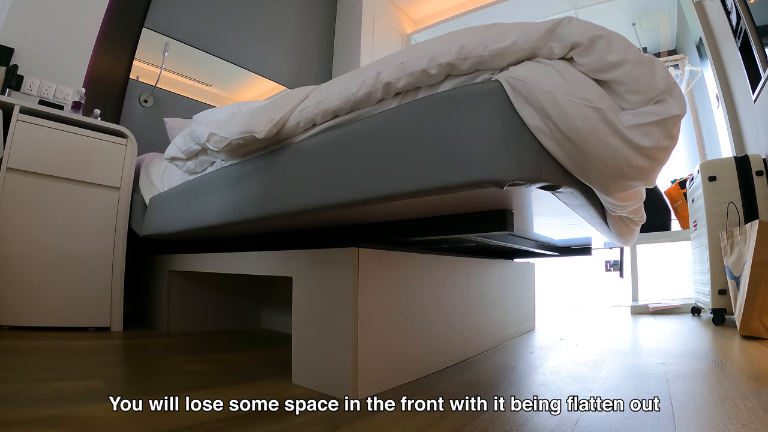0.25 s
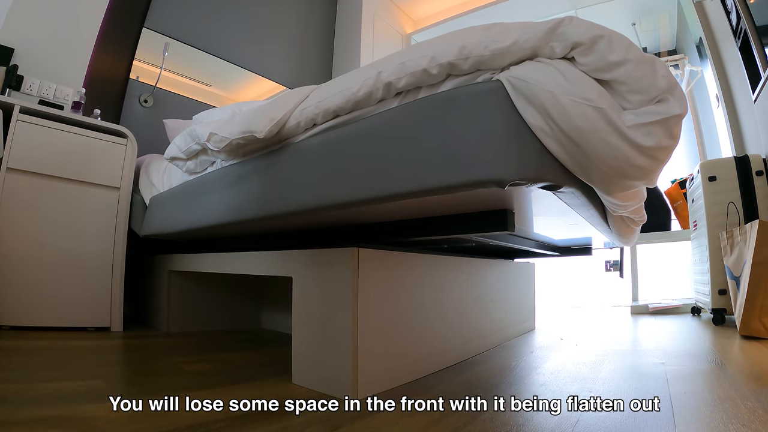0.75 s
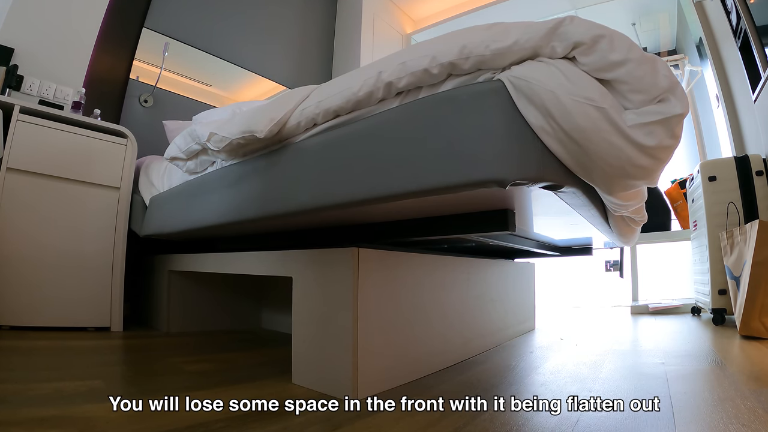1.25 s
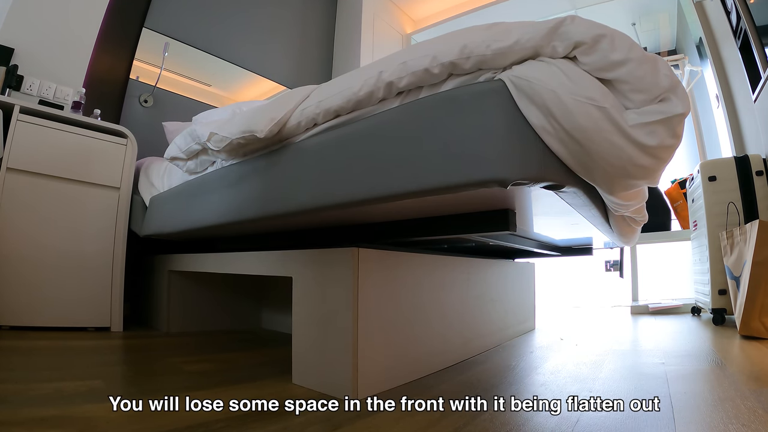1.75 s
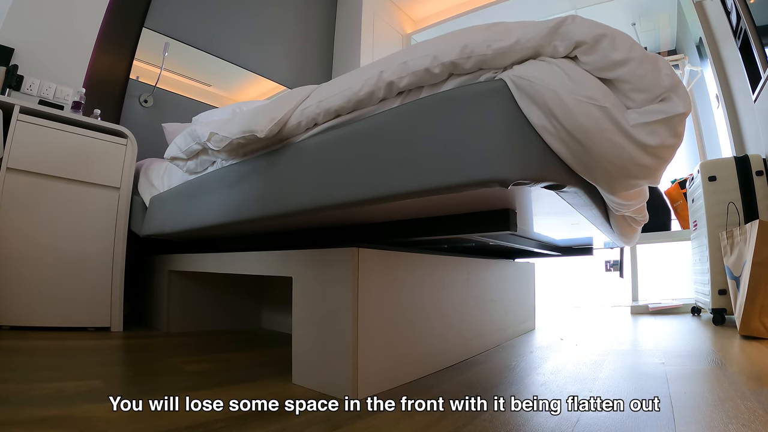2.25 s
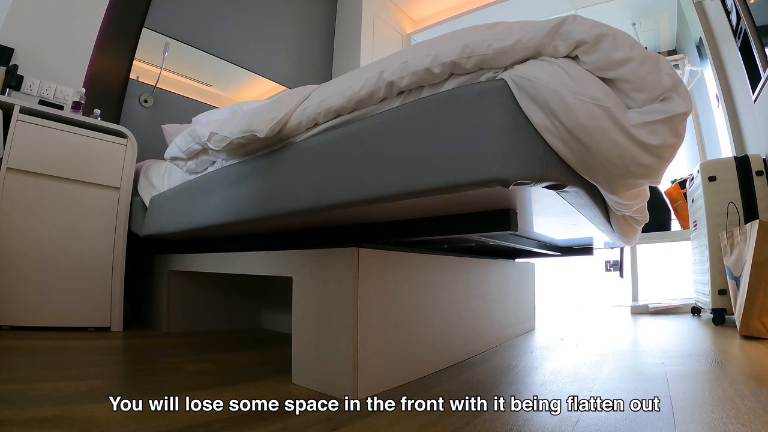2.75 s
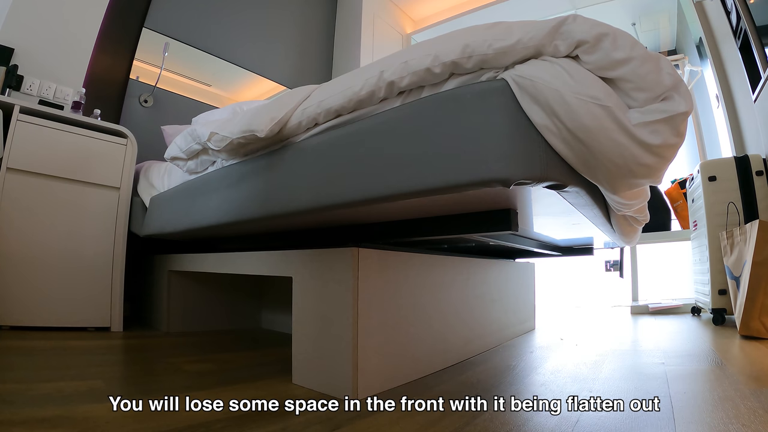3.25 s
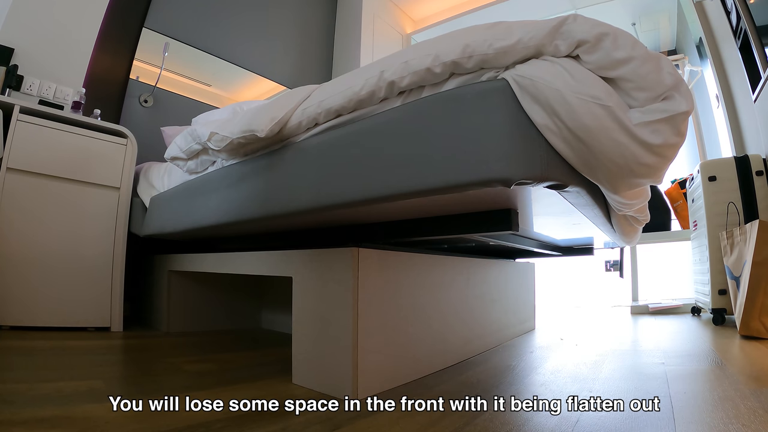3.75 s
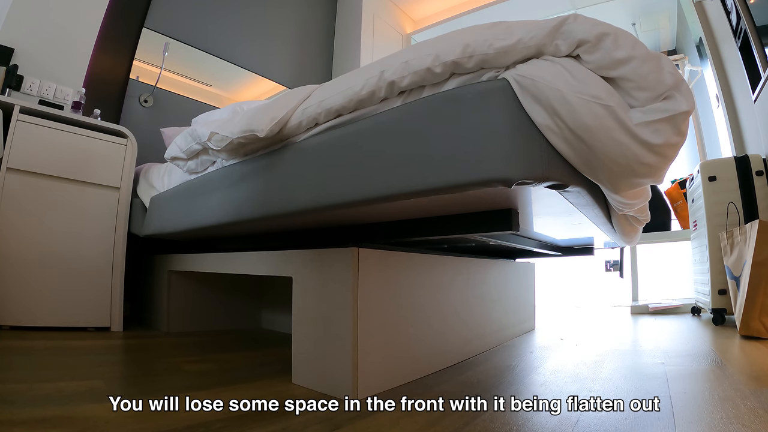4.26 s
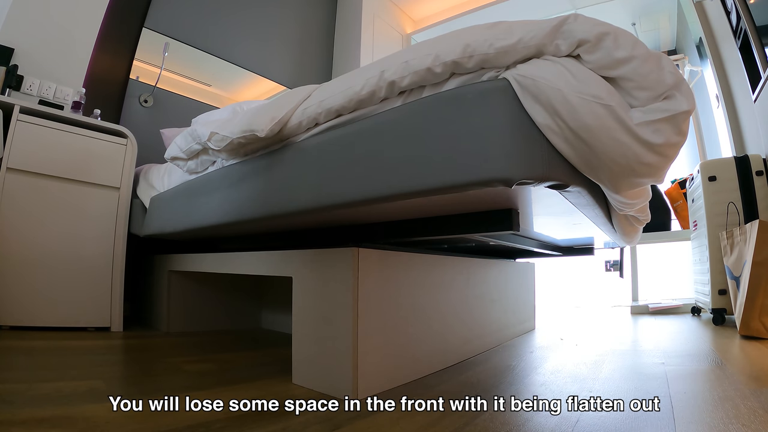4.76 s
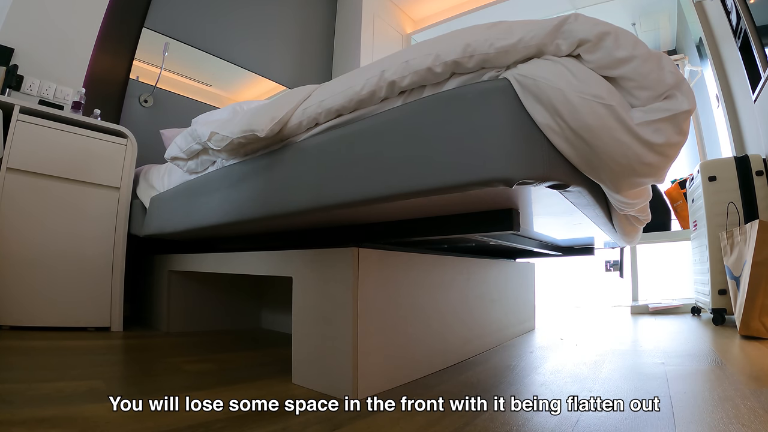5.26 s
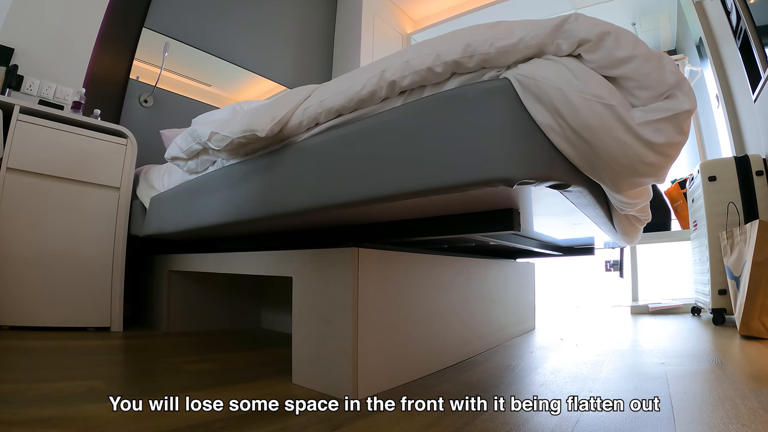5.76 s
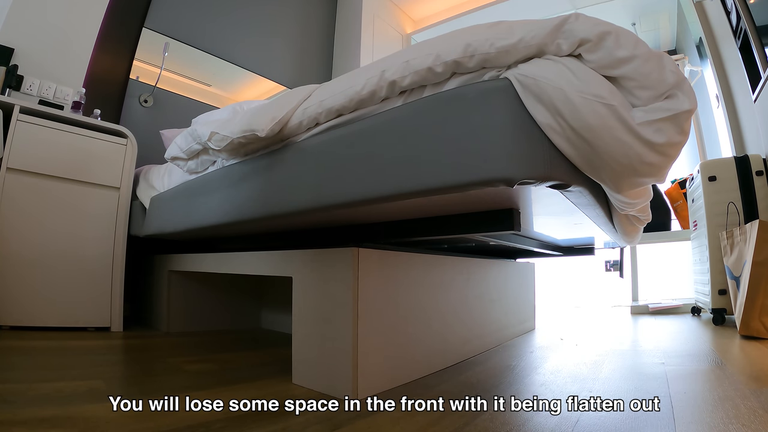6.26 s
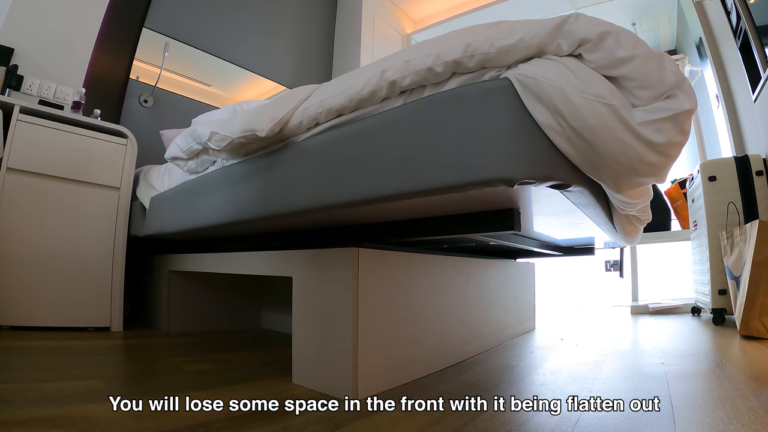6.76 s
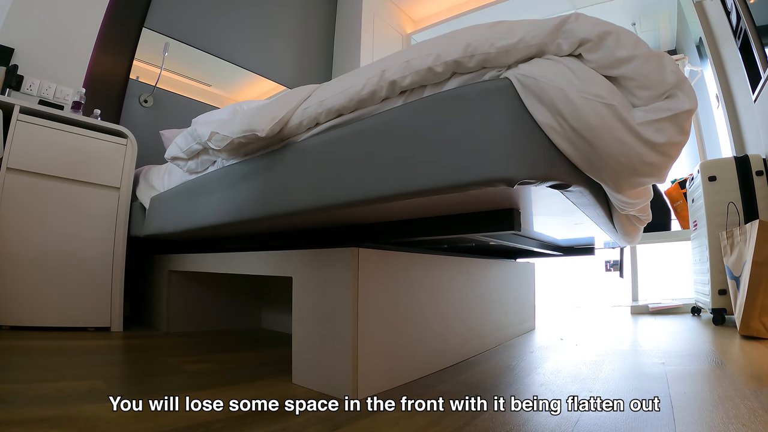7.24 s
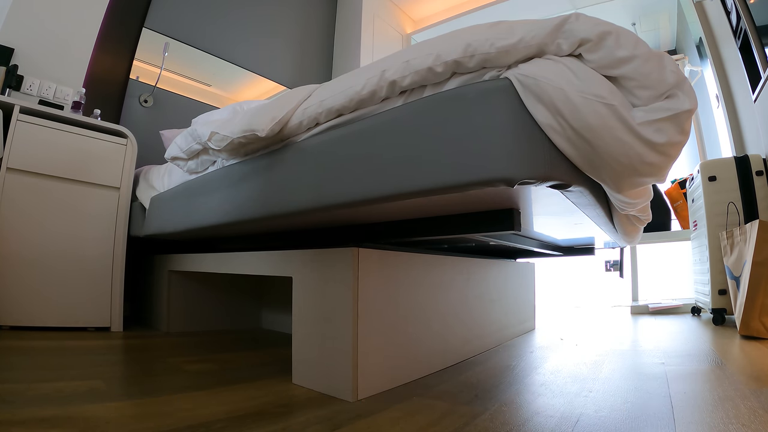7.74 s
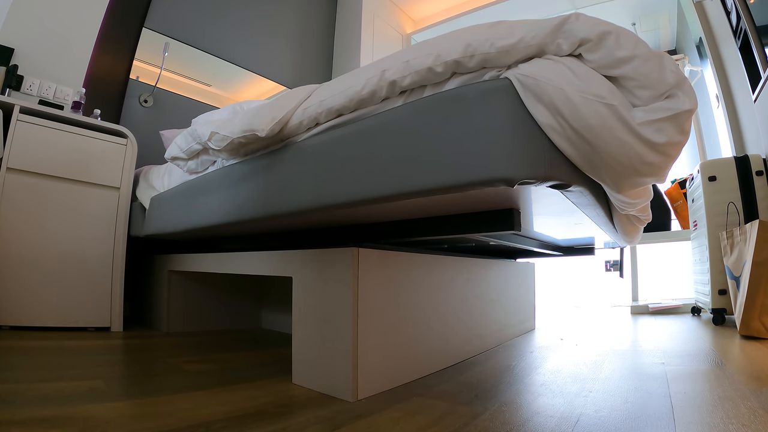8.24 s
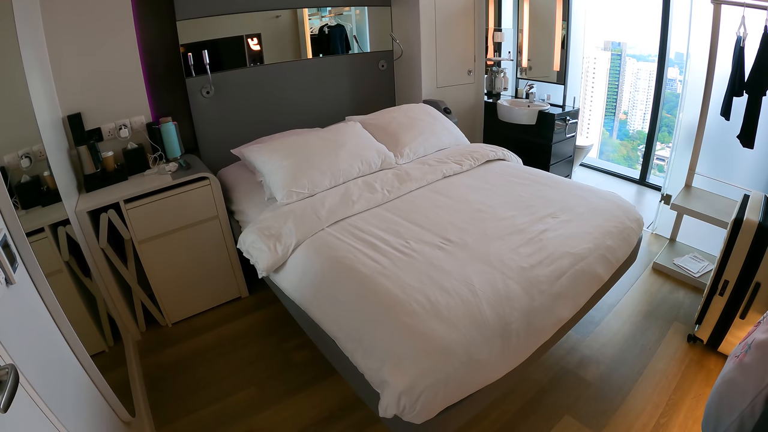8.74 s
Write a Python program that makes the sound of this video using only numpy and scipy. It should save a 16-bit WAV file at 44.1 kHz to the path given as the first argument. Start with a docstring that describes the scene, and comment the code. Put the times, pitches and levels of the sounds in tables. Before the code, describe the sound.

Adjustable bed motor hums steadily with a faint rattle and one creak, stops with a click and muffled clunks, followed by airy room ventilation.

```python
"""A small room, heard from the floor near an adjustable bed whose geared motor lowers the mattress.
The gear mesh sings one note over weaker shaft harmonics, filtered-noise frame rumble and brush hiss;
the lead screw rubs now and then, ringing the housing, and the frame creaks once.
A switch clicks, the motor stops, and the frame shudders and settles with dull knocks of damped sines and noise.
Then ventilation fades in, fan lines over rushing air, with soft bumps of low noise."""
import sys
import numpy as np
from scipy import signal
from scipy.fft import rfft, irfft
from scipy.io import wavfile

SR = 44100
rng = np.random.default_rng(int(sys.argv[2]) if len(sys.argv) > 2 else 0)


def generate_wav(signal):
    """Clip the signal to [-1, 1] and save it as 16-bit WAV at the path in sys.argv[1]."""
    frames = np.transpose(np.atleast_2d(signal))
    scaled = np.clip(frames, -1, 1) * 32767
    pcm = np.round(scaled).astype(np.int16)
    wavfile.write(sys.argv[1], SR, pcm)


N = 396900  # 9 s
T = np.arange(N) / SR
HZ = np.fft.rfftfreq(N, 1 / SR) + 0.00083  # the offset keeps log(HZ) finite

# Table levels are nominal: trims, wavering and the final filters come after them.
# Spectra are relative: colour() brings each to rms 1.

# hush of the room: (frequency [Hz], density [dB per Hz])
QUIET_SPECTRUM = [(200, -12), (340, 2), (430, -3.5), (600, -1), (680, -2.5), (750, -6.5), (950, -12),
                  (1100, -12), (2000, -16), (3000, -20.5), (4000, -26), (7000, -34), (9000, -54.5),
                  (12500, -48.5)]
QUIET_DB = -54.5

# ventilation air and its lighter hiss: (frequency [Hz], density [dB per Hz])
AIR_SPECTRUM = [(25, -23), (45, -13), (75, -0.5), (170, 2), (230, 1), (275, -3.5), (330, 1.5), (400, -8.5),
                (660, -17.5), (950, -26), (1600, -27.5), (4500, -45), (8500, -65), (12000, -77)]
DRAUGHT_SPECTRUM = [(1200, -7), (3000, -2), (4300, 2), (7000, -8), (9000, -30), (10800, -16), (12800, -32)]
# fan hum lines: (frequency [Hz], level [dB])
FAN_LINES = [(99.8, -44.5), (132.9, -48)]
# the fan hum swells and sags: (time [s], gain [dB])
FAN_SWELL_CURVE = [(7.92, 4), (8.02, -1), (8.19, 4), (8.28, -5), (8.4, 4), (8.6, 0), (8.78, -2.5),
                   (8.89, 0.5), (8.95, -6)]
# one puff of the draught: (time [s], half-width [s], gain [dB])
DRAUGHT_PUFF = (8.85, 0.18, 8.5)
VENT_START_S, VENT_FADE_S = 7.862, 0.8
VENT_TRIM_DB, DRAUGHT_DB = -0.6, -74.5

# soft bumps: (frequency [Hz], density [dB per Hz]), then (time [s], level [dB], t60 [s])
BUMP_SPECTRUM = [(60, -15), (150, -5), (330, 3), (500, 1), (700, 0.5), (820, -14), (1600, -14), (3000, -26),
                 (5000, -29), (9000, -53)]
BUMP_EVENTS = [(8.09, -48, 0.46), (8.155, -52, 0.25), (8.283, -42.5, 0.46)]

# noise of thuds and shudder, cracks and switch: (frequency [Hz], density [dB per Hz])
THUD_SPECTRUM = [(150, -32.5), (250, -15), (340, -5), (430, -2.5), (520, 1), (690, 0), (770, -12),
                 (950, -17.5), (1400, -40.5), (3000, -69.5)]
CRACK_SPECTRUM = [(400, -13.5), (850, 3.5), (1300, 8.5), (2000, 7), (2900, 2.5), (4000, -7.5), (6300, -10),
                  (8800, -33.5), (11000, -27.5), (12500, -32)]
SWITCH_SPECTRUM = [(1500, -24.5), (2900, -13), (3450, 6), (4200, -4), (5000, -12), (7500, -16), (9200, -28),
                   (12000, -27)]
# frame shaking on after the stop: (time [s], level [dB])
SHUDDER_CURVE = [(7.0, -93), (7.07, -49), (7.14, -41.5), (7.2, -43.5), (7.25, -50), (7.29, -48),
                 (7.38, -50), (7.5, -69), (7.56, -55), (7.7, -66), (7.8, -90)]
# frame resonances singing out: (time [s], half-width [s], frequency [Hz], level [dB])
SHUDDER_TONES = [(7.11, 0.02, 815, -49), (7.175, 0.029, 676, -46.5), (7.295, 0.035, 682, -44.5)]
# frame knocks and creak: (time [s], thud [dB], thud pitch [Hz], thud build-up [s], crack [dB],
# crack treble gain [dB], t60 of crack and room tail [s])
KNOCK_EVENTS = [(3.540, -36, 623, 0.006, -46.5, 6.5, 0.15), (3.555, -41.5, 480, 0.0055, -56.5, 8, 0.63),
                (7.095, -48, 680, 0.005, -68, -4, 0.86), (7.122, -41, 498, 0.005, -59, -3, 0.87),
                (7.282, -40, 564, 0.0056, -66, -5, 0.25), (7.305, -37, 606, 0.006, -70, -5, 0.25),
                (7.433, -43, 610, 0.0034, -72, -8, 0.11), (7.589, -44.5, 560, 0.006, -73, 1.5, 0.46),
                (7.604, -40, 567, 0.006, -73, -4, 0.44), (7.621, -39, 529, 0.0064, -67, -4, 0.44),
                (7.663, -44, 600, 0.005, -59, -15, 0.15), (7.678, -31.5, 601, 0.006, -49.5, -15, 0.12),
                (7.693, -34, 508, 0.0053, -60, -12, 0.33), (7.708, -40, 473, 0.0041, -63, -3, 0.17),
                (7.728, -42, 500, 0.003, -65, -4, 0.2)]
# switch click: (time [s], level [dB], t60 [s])
SWITCH_CLICK = (7.078, -56.5, 0.31)

# bed frame resonances: (frequency [Hz], width [Hz], relative gain [dB])
FRAME_MODES = [(337, 33, -8.5), (431, 82, -3.5), (506.4, 95, 0.5), (578.7, 91, 2), (637.5, 58.5, 2.5),
               (674.8, 28, 2), (844, 68, -9.5)]
# rattle of the teeth and hiss of the brushes: (frequency [Hz], density [dB per Hz])
RATTLE_SPECTRUM = [(600, -29), (900, 0), (1200, 1.5), (1450, 1), (1650, -3), (1900, -1.5), (2250, -5.5),
                   (2950, -6.5), (3600, -17), (5000, -44.5)]
BRUSH_SPECTRUM = [(1800, -19.5), (2700, 4), (3500, 3), (4500, 1.5), (5500, 0.5), (7000, -6), (8000, -12),
                  (9200, -23), (11000, -12), (12800, -26.5)]
# levels changing evenly over the travel: (bed upright [dB], bed flat [dB])
RUMBLE_TRAVEL = (-53.5, -46.5)
RATTLE_TRAVEL = (-58.5, -58.5)
HOUSING_TRAVEL = (-74, -62)
# lead screw rubs: (time [s], half-width [s], rise of housing ring and high whine [dB], rise of rattle [dB])
SCREW_RUBS = [(0.43, 0.07, 3, 0.5), (1.378, 0.1, 9.5, 0.7), (2.097, 0.06, 8, 1), (3.048, 0.13, 9, 0.5),
              (3.82, 0.05, 10, 1), (4.11, 0.095, 9, 2), (4.8, 0.22, 2.5, 1.2)]
# the brushes quieten as the load eases
BRUSH_DB, EASE_DB, EASE_S, EASE_LENGTH_S = -67, -4.5, 4.9, 0.5

SHAFT_HZ, MESH_ORDER, WHEEL_RATIO = 45.29, 12, 19  # shaft turns per second, teeth, shaft turns per wheel turn
STOP_S, COAST_S = 7.075, 0.017  # power cut, then the decay time constant of the gear tones
# gear mesh note: (time [s], level [dB])
MESH_CURVE = [(0.05, -39.5), (2.18, -39), (2.29, -36.5), (2.82, -38.5), (3.53, -36.5), (3.86, -38.5),
              (3.98, -36), (5.16, -38), (5.32, -36), (5.35, -41.5), (5.43, -33.5), (5.49, -39.5),
              (6.09, -38), (6.17, -41), (6.26, -34), (6.38, -42), (6.69, -39), (7.0, -41.5)]
# mesh surge as the drive reaches its end stop: (time [s], half-width [s], gain [dB])
END_STOP_SURGE = (7.064, 0.019, 6.8)
# weaker shaft harmonics: (multiple of shaft rate [1], bed upright [dB], bed flat [dB])
SHAFT_HARMONICS = [(9, -79.5, -60.5), (10, -73, -68), (13, -57, -62), (14, -71, -66), (15, -73.5, -63.5),
                   (17, -74.5, -68), (21, -81.5, -71), (24, -71.5, -74.5), (28, -75.5, -76.5),
                   (31, -72, -69.5), (36, -80.5, -71.5), (45, -83.5, -76), (48, -70.5, -92.5),
                   (55, -76, -76.5)]
# harmonics that sing out late in the travel: (low, middle, high) multiples of shaft rate [1]
WHINE_MULTIPLES = (18, 19, 37)
# their levels: (time [s], level [dB])
LOW_WHINE_CURVE = [(0, -68.5), (4.2, -67), (4.7, -61), (4.85, -64.5), (5.2, -65), (5.35, -50.5),
                   (5.72, -59.5), (6.14, -55.5), (6.28, -57), (6.39, -51.5), (6.57, -70.5), (6.87, -56),
                   (7.0, -72)]
MIDDLE_WHINE_CURVE = [(0, -65), (0.41, -77.5), (0.6, -61.5), (1.17, -72.5), (1.38, -61), (2.15, -69),
                      (2.3, -61.5), (2.89, -67), (3.14, -61), (4.1, -65.5), (4.38, -58), (4.62, -65.5),
                      (5.18, -56), (5.65, -64.5), (6.03, -55), (6.5, -69.5), (6.8, -55.5), (7.0, -70)]
HIGH_WHINE_CURVE = [(4.2, -77), (4.55, -70), (4.85, -68.5), (5.15, -74), (5.45, -65.5), (6.25, -65),
                    (6.36, -69.5), (6.48, -53.5), (6.6, -65.5), (6.93, -62), (7.05, -76)]

LOW_CUT_HZ, TOP_HZ = 329, 12800


def undb(db):
    """Decibels to gain."""
    return np.exp(np.asarray(db) * (np.log(10) / 20))


def unit(x):
    """Scale to rms 1 about the mean."""
    return x / np.std(x)


def curve(rows):
    """Gain over time, joining (time [s], level [dB]) points evenly in dB."""
    return undb(np.interp(T, *np.transpose(rows)))


def travel(upright_db, flat_db):
    """Gain that moves evenly in dB as the bed goes from upright to flat."""
    return undb(np.interp(T, [0, STOP_S], [upright_db, flat_db]))


def step(time, length):
    """A soft rise from 0 to 1 around a moment."""
    return (1 + np.tanh((T - time) / length)) / 2


def swell(time, half_width):
    """A smooth bump from 0 to 1 and back, down to 1/e at the half-width."""
    return np.exp(-((T - time) / half_width) ** 2)


def fade(start, t60, rise=0.0017):
    """Envelope of a blow that builds up briefly and dies away in the room."""
    age = np.maximum(T - start, 0)
    return (1 - np.exp(-age / rise)) * np.exp(-np.log(1000) * age / t60)


def noise():
    """White noise."""
    return rng.standard_normal(N)


def walk(rate):
    """Smooth random wander of spread 1, its bandwidth set by rate [Hz]."""
    times = T[::20]
    chance = rfft(rng.standard_normal(len(times)))
    smooth = chance * np.exp(-(HZ[:len(chance)] / rate) ** 2)
    return np.interp(T, times, unit(irfft(smooth, len(times))))


def colour(x, points):
    """Shape x with a spectrum drawn over log frequency, at rms 1."""
    hz, db = np.transpose(points)
    gain = undb(np.interp(np.log(HZ), np.log(hz), db))
    return unit(irfft(rfft(x) * gain, N))


def ring(x, hz, width):
    """One resonance, gain 1 at its centre."""
    return signal.lfilter(*signal.iirpeak(hz, hz / width, fs=SR), x)


def low_cut(x, order=40, leak_db=-30):
    """A very steep high-pass leaves the sound almost without bass."""
    ratio = np.minimum(LOW_CUT_HZ / HZ, 2)  # capped to avoid overflow
    gain = undb(leak_db) + 1 / np.sqrt(1 + ratio ** (2 * order))
    return irfft(rfft(x) * gain, N)


def still_room():
    """The faint hush of the room: coloured noise that wavers slightly."""
    return colour(noise(), QUIET_SPECTRUM) * undb(QUIET_DB + 1.3 * walk(4.8))


def ventilation(air_db=-44.0, waver_db=1.2, gust_db=0.8, wander_rad=0.77):
    """Two swelling, phase-wandering fan lines over uneven rushing air and a light hiss, fading in together."""
    lines = 0
    for hz, db in FAN_LINES:
        tone = np.sin(2 * np.pi * hz * T + wander_rad * walk(8.6))
        lines = lines + undb(db + waver_db * walk(16)) * tone
    lines = np.sqrt(2) * curve(FAN_SWELL_CURVE) * lines
    air = colour(noise(), AIR_SPECTRUM) * undb(air_db + gust_db * walk(25))
    time, half_width, puff_db = DRAUGHT_PUFF
    draught_gain = undb(DRAUGHT_DB + puff_db * swell(time, half_width))
    hiss = low_cut(colour(noise(), DRAUGHT_SPECTRUM)) * draught_gain
    fade_in = np.clip((T - VENT_START_S) / VENT_FADE_S, 0, 1)
    return fade_in * (undb(VENT_TRIM_DB) * (lines + air) + hiss)


def bumps(rise_s=0.0089):
    """Soft, deep bumps somewhere in the room: low noise under slow-rising blow envelopes."""
    envelope = sum(undb(db) * fade(start, t60, rise_s) for start, db, t60 in BUMP_EVENTS)
    return colour(noise(), BUMP_SPECTRUM) * envelope


def shudder(slip_rad=0.45):
    """After the stop the frame shakes on as dull noise, and some of its resonances sing out briefly."""
    rings = 0
    for time, half_width, hz, db in SHUDDER_TONES:
        tone = np.sin(2 * np.pi * hz * T + slip_rad * walk(30))
        rings = rings + undb(db) * swell(time, half_width) * tone
    return curve(SHUDDER_CURVE) * colour(noise(), THUD_SPECTRUM) + np.sqrt(2) * rings


def knocks(tail_db=-16.5):
    """Each slip of a joint rings the frame for a few cycles and cracks above it, and the room answers."""
    tail_noise = colour(noise(), THUD_SPECTRUM)
    crack = colour(noise(), CRACK_SPECTRUM)
    treble = signal.sosfilt(signal.butter(1, 3000, "high", fs=SR, output="sos"), crack)
    out = 0
    for start, thud_db, hz, rise, crack_db, treble_db, t60 in KNOCK_EVENTS:
        age = np.clip(T - start, 0, 1)
        blow = (age / rise * np.exp(1 - age / rise)) ** 2  # peaks at 1 when age equals rise
        body = blow * np.sin(2 * np.pi * hz * age)
        tail = undb(tail_db) * fade(start + rise, t60) * tail_noise
        snap = fade(start, t60) * (crack + (undb(treble_db) - 1) * treble)
        out = out + undb(thud_db) * (body + tail) + undb(crack_db) * snap
    return out


def switch_click():
    """The switch clicks once: a short blow of bright noise with the room's decay."""
    start, db, t60 = SWITCH_CLICK
    return undb(db) * fade(start, t60) * colour(noise(), SWITCH_SPECTRUM)


def frame(x):
    """The bed frame rings at its resonances; the mattress muffles everything higher."""
    modes = 0
    for k, (hz, width, db) in enumerate(FRAME_MODES):
        modes = modes + (-1) ** k * undb(db) * ring(x, hz, width)  # neighbours in opposite polarity
    return unit(signal.sosfilt(signal.butter(5, 950, fs=SR, output="sos"), modes))


def gears(angle, wheel, rub_db, mesh_db=0.74, flutter_db=0.76, waver_db=2.0, whine_waver_db=1.5,
          whine_wheel_db=1.0, harmonics_db=0.2, slip_rad=0.31, whine_slip_rad=0.46, rasp=0.21):
    """Meshing teeth sing at multiples of the shaft rate, shifting in strength over the travel."""
    def partial(multiple, jitter_rad):
        """One harmonic of the shaft with a random, jittering phase."""
        phase = rng.uniform(0, 2 * np.pi) + jitter_rad * walk(9.1)
        return np.sin(round(multiple) * angle + phase)

    time, half_width, surge_db = END_STOP_SURGE
    mesh_gain = undb(mesh_db + surge_db * swell(time, half_width) + flutter_db * walk(22))
    out = curve(MESH_CURVE) * mesh_gain * np.sin(MESH_ORDER * angle)
    for multiple, upright_db, flat_db in SHAFT_HARMONICS:
        gain = travel(upright_db, flat_db) * undb(harmonics_db + waver_db * walk(6.7))
        out = out + gain * partial(multiple, slip_rad)
    low, middle, high = (partial(multiple, whine_slip_rad) * undb(whine_waver_db * walk(9.5))
                         for multiple in WHINE_MULTIPLES)
    lower_whines = curve(LOW_WHINE_CURVE) * low + curve(MIDDLE_WHINE_CURVE) * middle
    out = out + undb(whine_wheel_db * wheel) * lower_whines
    # the highest whine rasps and rises with the rubbing screw
    out = out + curve(HIGH_WHINE_CURVE) * undb(rub_db) * high * (1 + rasp * walk(70))
    return np.sqrt(2) * out


def motor(housing_hz=1640, housing_width_hz=260, throb=0.12, wheel_db=0.35, grain_db=0.5, grind_db=1.55,
          rumble_waver_db=0.4, housing_waver_db=0.3):
    """Teeth shake the frame and rattle, the screw rings the housing, brushes hiss; all die at the power cut."""
    stopped = np.maximum(T - STOP_S, 0)
    speed = SHAFT_HZ * (1 + 0.00088 * walk(3.18)) * np.exp(-stopped / 2.7)
    angle = 2 * np.pi * np.cumsum(speed) / SR
    # the slow output wheel loads the teeth unevenly; contact also varies within each shaft turn
    wheel = -np.cos(angle / WHEEL_RATIO)
    contact = 1 + throb * np.cos(angle) + 0.14 * np.cos(3 * angle)
    friction = undb(0.7 * walk(12))  # shared by rattle and brushes
    ring_rise, rattle_rise = sum(np.outer(rises, swell(time, half_width))
                                 for time, half_width, *rises in SCREW_RUBS)

    rumble = frame(noise() * contact * undb(grind_db * walk(35)))
    rumble = rumble * travel(*RUMBLE_TRAVEL) * undb(wheel_db * wheel + rumble_waver_db * walk(15.0))

    rattle = colour(noise() * contact * undb(grain_db * walk(440)), RATTLE_SPECTRUM)
    rattle = rattle * travel(*RATTLE_TRAVEL) * undb(rattle_rise) * friction

    housing = noise() * contact
    for _ in range(2):  # two passes steepen the resonance
        housing = ring(housing, housing_hz, housing_width_hz)
    housing = unit(housing) * travel(*HOUSING_TRAVEL) * undb(ring_rise + housing_waver_db * walk(6))

    eased = step(EASE_S, EASE_LENGTH_S)
    hiss = colour(noise(), BRUSH_SPECTRUM) * undb(BRUSH_DB + EASE_DB * eased) * friction

    tones = gears(angle, wheel, ring_rise) * np.exp(-stopped / COAST_S)
    return tones + (rumble + rattle + housing + hiss) * np.exp(-stopped / 0.29)


def scene():
    """The bed and the hush of the room sound thin; only the ventilation and the bumps have bass."""
    thin = still_room() + shudder() + knocks() + switch_click() + motor()
    thin = thin * signal.windows.tukey(N, .002)  # brief fades at both ends
    return (ventilation() + bumps() + low_cut(thin))[None]


def record(dry):
    """A steep elliptic low-pass cuts the top."""
    return signal.sosfilt(signal.ellip(10, .2, 80, TOP_HZ, fs=SR, output="sos"), dry)


dry = scene()
out = record(dry)
generate_wav(out)
```